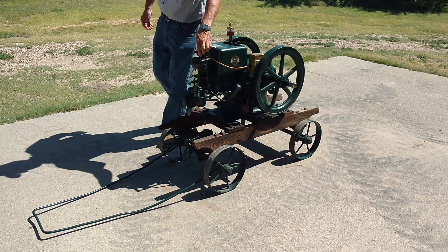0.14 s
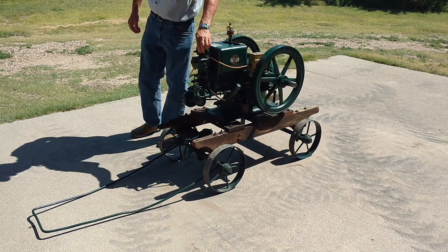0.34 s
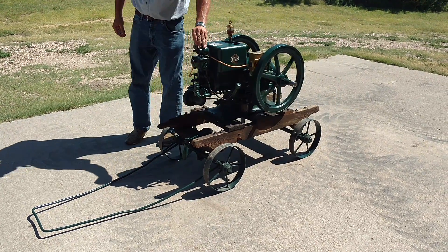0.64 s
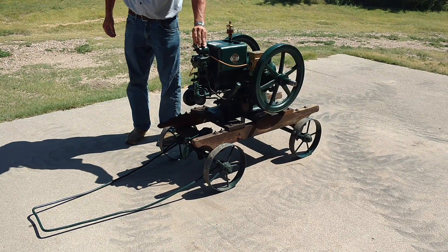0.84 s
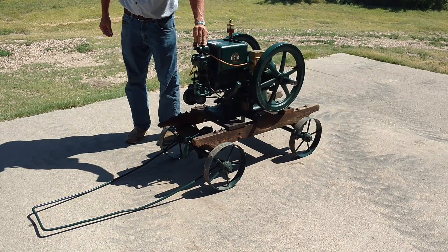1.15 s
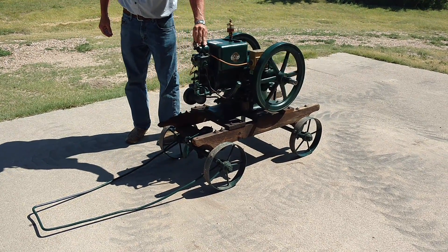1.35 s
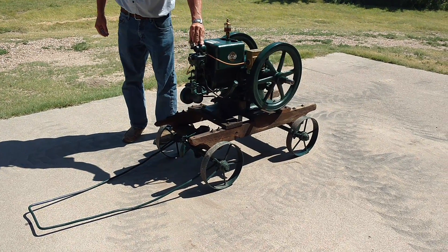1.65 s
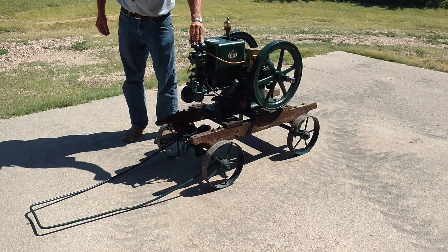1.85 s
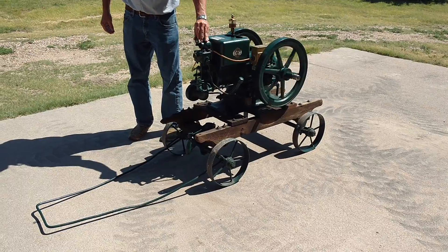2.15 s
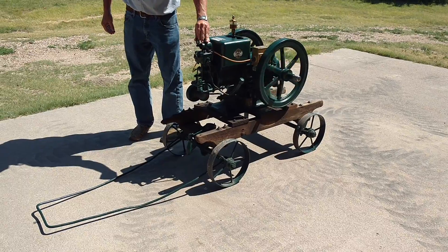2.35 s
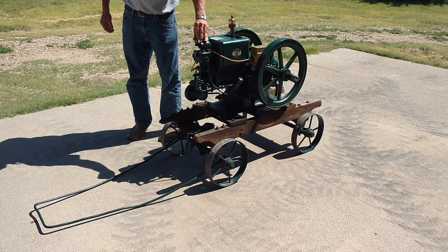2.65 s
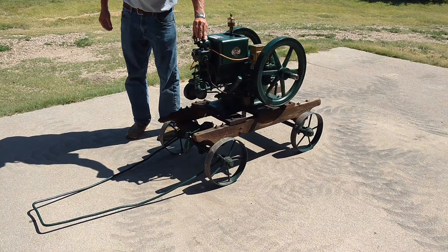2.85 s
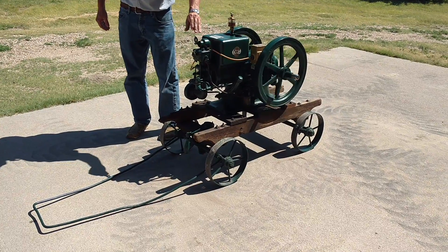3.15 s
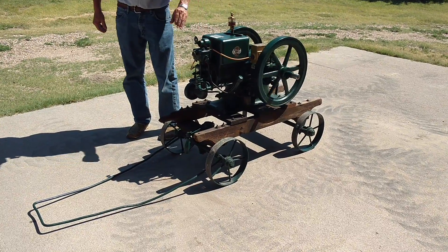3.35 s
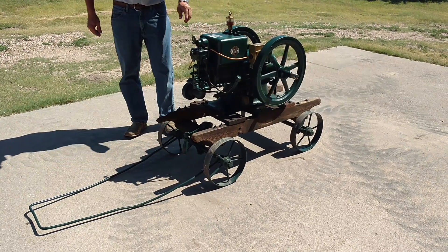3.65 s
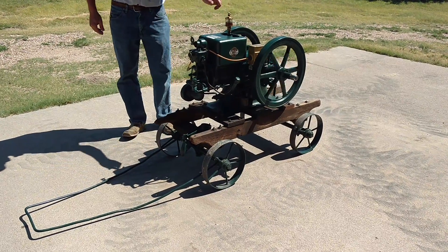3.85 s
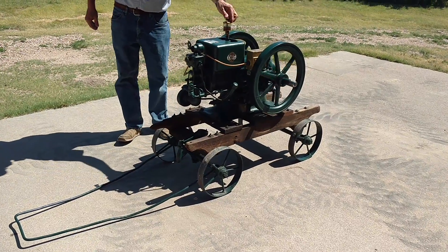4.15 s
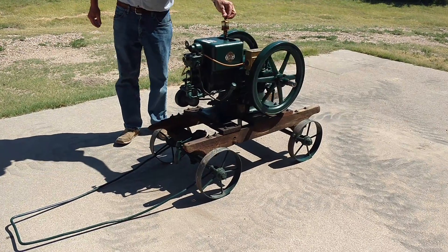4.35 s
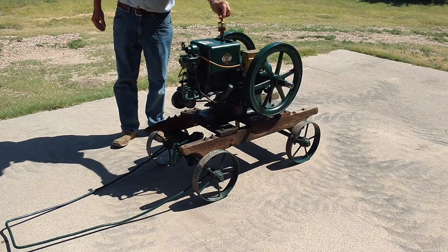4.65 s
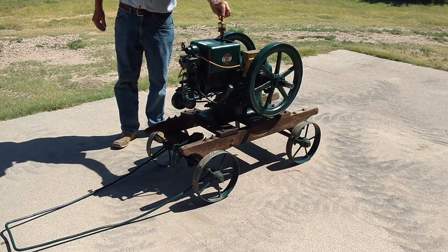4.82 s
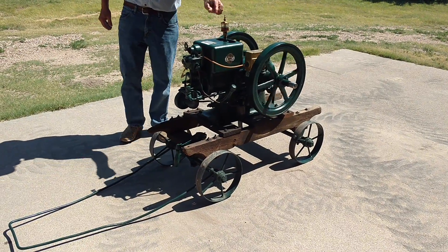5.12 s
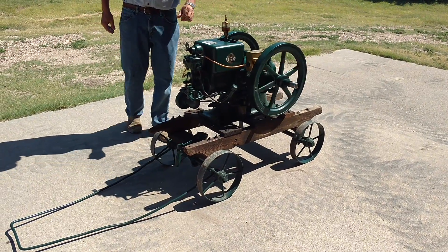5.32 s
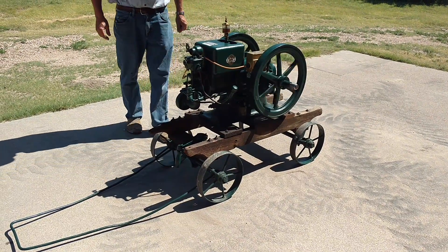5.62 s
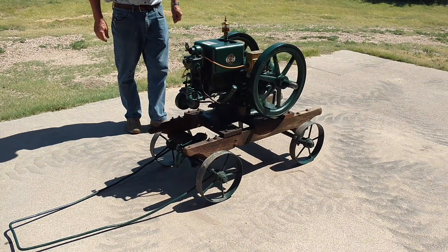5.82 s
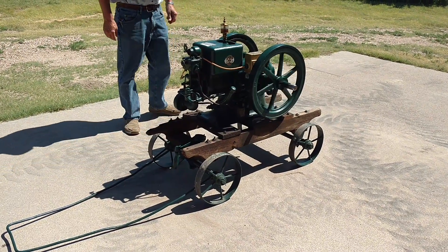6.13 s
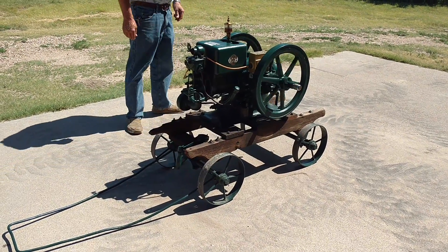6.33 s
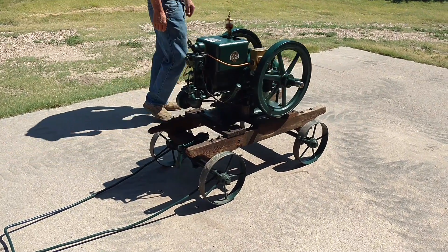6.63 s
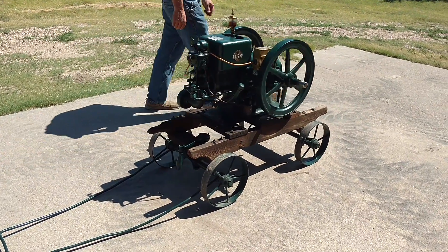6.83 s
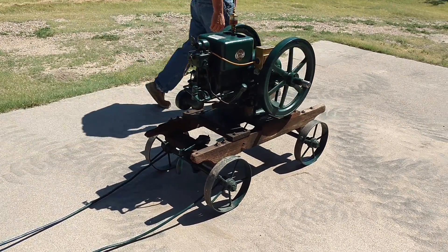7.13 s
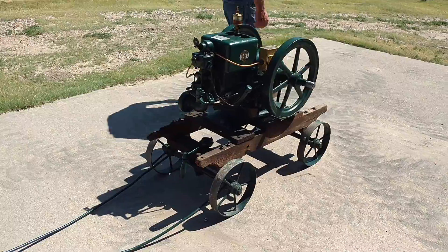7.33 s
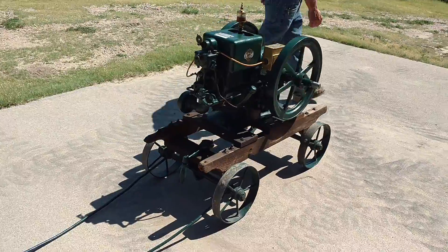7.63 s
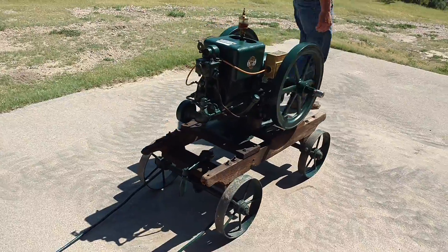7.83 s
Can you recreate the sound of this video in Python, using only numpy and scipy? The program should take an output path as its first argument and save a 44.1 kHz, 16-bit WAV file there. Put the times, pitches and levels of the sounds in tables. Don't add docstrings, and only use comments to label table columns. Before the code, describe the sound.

Steady mechanical clatter of a vintage stationary engine outdoors: ringing iron casting, gritty gear rumble, crisp ticking and thin high whistles once per turn. Brief noisy exhaust bursts punctuate it at uneven gaps. The pace quickens over the first two seconds, the clatter thickens and peaks around four, then turns gradually slow. Dry, close sound with a very short echo from concrete, faint cart drone and a low outdoor murmur.

```python
import sys
import numpy as np
from scipy import signal
from scipy.fft import rfft, irfft
from scipy.io import wavfile
from scipy.ndimage import uniform_filter1d

SR = 44100
rng = np.random.default_rng(int(sys.argv[2]) if len(sys.argv) > 2 else 0)


def file_out(sig):
    cols = np.atleast_2d(sig).T
    lim = np.clip(cols, -1, 1)
    pcm = np.round(lim * 32767).astype(np.int16)
    wavfile.write(sys.argv[1], SR, pcm)


def gain_from_db(level_db):
    decades = np.asarray(level_db, float) / 20
    return 10 ** decades


N = 351918
T = np.arange(N) / SR

# start_s, knock_db, tick_db, lever_db
TURNS = [(-0.21, -33.5, -42, -29.5), (0.122, -30.5, -40, -51), (0.443, -40, -39, -32),
         (0.734, -33, -52, -26), (1.022, -50, -53, -35), (1.29, -34, -45, -50), (1.555, -41, -40, -28),
         (1.804, -39, -36, -29), (2.04, -34, -35, -43), (2.274, -33, -37, -44), (2.513, -30.5, -39, -35),
         (2.754, -28.5, -33.5, -38), (3.008, -28, -42, -34), (3.258, -28, -30, -27),
         (3.512, -27.5, -34, -27.5), (3.773, -23, -27, -24), (4.04, -28.5, -34, -32),
         (4.312, -23.5, -29.5, -32), (4.595, -43, -35, -46), (4.881, -31, -38, -38),
         (5.179, -26.5, -33.5, -36), (5.485, -25, -40, -36), (5.792, -29.5, -31.5, -32.5),
         (6.104, -28, -35, -34), (6.427, -26, -31, -25), (6.756, -30, -35, -39), (7.081, -22, -31.5, -26.5),
         (7.416, -26.5, -32, -49), (7.742, -29.5, -34.5, -46), (8.075, -26, -32, -60)]
# share_of_turn, lag_s
PART_AT = [(0, 0), (.075, 0), (.06, .033), (.129, .043), (.315, 0), (.39, 0), (.487, -.016), (.51, 0),
           (.553, -.005), (.718, 0), (.623, .054), (.88, 0), (.657, .07), (.813, .043)]
# knock_db, tick_db, lever_db, firing_change_db
PART_DB = [(-9, 0.5, -43, 4), (-14, -3, 4, 6), (-6.5, 4.5, -15, 0), (-9.5, -10, -20, 0.5),
           (-5.5, 0, 6, -23), (-10, -8.5, -22, -43), (-2.5, 3, 1, 0.5), (-4.5, 10, -24, -13.5),
           (-16.5, -35, -12, 4), (-2, -27, -22, 2), (-10, -7.5, 10, -12), (-7, -16, 8, 0.5),
           (-36, -39, 18, 2), (-19.5, -33, 18.5, -35)]
# start_s, peak_db
KNOCKS_EARLY = [(0.035, -29), (0.127, -22), (0.264, -25), (0.356, -24), (0.446, -22), (0.498, -26.5),
                (0.533, -19), (0.827, -20.5), (1.029, -25.5), (1.099, -21), (1.291, -32), (1.558, -27.5),
                (1.605, -30), (1.631, -22), (1.866, -30), (1.881, -39), (2.04, -32), (2.11, -27),
                (2.209, -31), (2.281, -27), (2.516, -29), (2.564, -27), (2.599, -38), (2.637, -25.5),
                (2.76, -26), (2.809, -20), (2.864, -22), (2.936, -21.5), (3.008, -22.5), (3.054, -30),
                (3.07, -19), (3.134, -24), (3.223, -22), (3.26, -22.5), (3.308, -36), (3.366, -17),
                (3.389, -19), (3.443, -23), (3.48, -18.5), (3.516, -14), (3.562, -14.5), (3.7, -23),
                (3.777, -14), (3.824, -15.5), (3.855, -20), (3.892, -18), (3.965, -14)]
KNOCKS_LATE = [(4.007, -21), (4.045, -13), (4.091, -14.5), (4.238, -30), (4.314, -22), (4.365, -24),
               (4.437, -22), (4.455, -24), (4.512, -22.5), (4.598, -17), (4.649, -16.5), (4.678, -19),
               (4.883, -28.5), (5.093, -25), (5.183, -20), (5.232, -26.5), (5.314, -25.5), (5.4, -21),
               (5.489, -22), (5.539, -24), (5.623, -24), (5.71, -26), (5.795, -21.5), (5.848, -21.5),
               (5.926, -22.5), (6.017, -20), (6.109, -16), (6.168, -18), (6.19, -18), (6.246, -24),
               (6.334, -26), (6.427, -23), (6.482, -22), (6.569, -20), (6.592, -22.5), (6.662, -17.5),
               (6.724, -23), (6.757, -17), (6.813, -12), (6.835, -15.5), (6.898, -20), (6.993, -24),
               (7.081, -22), (7.135, -26), (7.225, -22), (7.322, -18.5), (7.418, -17.5), (7.479, -15.5),
               (7.512, -25), (7.56, -21.5), (7.651, -28), (7.743, -25.5), (7.796, -20), (7.889, -19)]
# pitch_hz, width_hz, level_db
IRON_MODES = [(510, 420, -6), (590, 210, 0.5), (701.7, 51, 1), (869, 43, -4.5), (938, 56, 0.5),
              (1023, 180, -3), (1277, 164, 1.5), (1543, 113, 1.5), (1720, 300, 0), (1898, 180, -1),
              (2200, 3800, 3.5)]
# start_s, gear_rumble_db, gas_hiss_db, cart_drone_db
RUNNING = [
    (0.0, -46.5, -48, -69),
    (2.33, -40.5, -47, -53.5),
    (3.51, -33.5, -40, -46),
    (5.07, -44.5, -48.5, -65),
    (6.58, -39.5, -43, -55.5),
    (7.98, -40.5, -46, -56),
]
# share_of_turn, rumble_change_db, hiss_change_db
SLACK = [
    (0, 3.5, 1.5),
    (.57, 0, -3),
    (.63, -10, -6.5),
    (.69, 1.5, -4),
    (.73, -1.5, 4.5),
    (.8, -2.5, -4.5),
    (.97, -2.5, -5.5),
    (1, -1, 2.5),
]
# start_s, peak_db, body_relative_to_peak_db, length_s, opening_pop_db
PUFFS = [(0.523, -9.5, 1.5, 0.035, -36), (0.81, -15.5, -12, 0.032, -52), (1.096, -7.5, 4, 0.027, -33),
         (1.623, -7, 1.5, 0.023, -33), (1.866, -12, 10.5, 0.024, -33), (2.102, -9.5, 5, 0.02, -32.5),
         (2.592, -18.5, 15.5, 0.015, -33.5), (3.069, -11.5, -9, 0.021, -26.5),
         (3.58, -12, -2, 0.018, -30.5), (4.105, -11.5, 4, 0.025, -29.5), (4.683, -6, 3.5, 0.012, -23.5),
         (5.563, -14.5, 0, 0.026, -30.5), (6.186, -11.5, -6, 0.025, -28), (6.84, -11.5, -8, 0.018, -26),
         (7.5, -13, 11.5, 0.026, -28)]
# pitch_hz, level_db
GAS_COLOUR = [(60, -64), (300, -11), (600, 0.5), (1500, -5.5), (3300, 7), (6000, 3.5), (9000, -1.5),
              (12000, -2.5), (15500, -7.5), (16500, -24)]
# start_s, peak_db, top_end_db
TICKS_EARLY = [(0.174, -31, -41), (0.2617, -20.5, -37), (0.2853, -24, -47), (0.5317, -10.5, -20.5),
               (0.6469, -39, -52), (0.822, -12.5, -43), (0.8824, -34, -45), (0.9333, -27, -46),
               (0.984, -31, -46), (1.027, -34, -41), (1.055, -39, -43), (1.0735, -31, -43),
               (1.107, -10, -36), (1.1623, -27, -47), (1.292, -30, -39.5), (1.3395, -32, -36),
               (1.5324, -32, -48), (1.6104, -28, -41), (1.6292, -8, -41), (1.8522, -32, -41),
               (1.875, -20, -22), (2.0313, -31, -43), (2.0892, -32, -39), (2.1086, -15, -22),
               (2.3226, -35, -42), (2.377, -23, -34), (2.3965, -27, -49), (2.5671, -32, -44),
               (2.595, -17.5, -41), (2.617, -22, -33), (2.6369, -27, -37), (2.7581, -26, -31),
               (2.8624, -20, -31.5), (2.883, -18, -42), (3.056, -20, -34), (3.0717, -11, -33),
               (3.1124, -15, -32), (3.133, -20, -39), (3.1872, -41, -49), (3.257, -20, -36),
               (3.3059, -20, -36), (3.3653, -19, -28.5), (3.386, -15.5, -36), (3.44, -26, -44),
               (3.474, -24, -44), (3.5146, -25, -37), (3.5617, -15.5, -35), (3.5876, -16, -38),
               (3.6224, -19, -30), (3.6436, -25, -43), (3.775, -41, -31), (3.8215, -19, -33),
               (3.861, -18, -40), (3.8866, -17, -27), (3.907, -21, -43), (3.9669, -24, -48)]
TICKS_LATE = [(4.0907, -20.5, -34), (4.114, -19, -26), (4.158, -30, -37), (4.18, -25.5, -48),
              (4.318, -27, -39), (4.364, -23.5, -35), (4.4326, -19.5, -31), (4.4554, -16.5, -38),
              (4.594, -22.5, -29), (4.6447, -20.5, -33), (4.6692, -30, -32), (4.684, -8, -25),
              (4.718, -29, -41), (4.9318, -31, -40), (5.008, -28, -35), (5.033, -25.5, -44),
              (5.181, -26, -36.5), (5.2315, -30, -38.5), (5.3098, -22, -36), (5.3356, -26, -50),
              (5.401, -33, -48), (5.5396, -25, -39), (5.571, -22, -23), (5.62, -23.5, -35.5),
              (5.6441, -27, -46), (5.7933, -31, -39), (5.846, -26.5, -42), (5.926, -19.5, -33),
              (5.951, -23.5, -49), (6.0178, -39, -55), (6.109, -24.5, -36), (6.1587, -20.5, -38),
              (6.1934, -31, -28), (6.243, -23, -31), (6.269, -23, -46), (6.479, -26, -35),
              (6.564, -19, -34), (6.5904, -22.5, -44), (6.759, -22, -37), (6.8093, -20, -32),
              (6.844, -33, -26), (6.897, -21, -35), (6.9212, -26.5, -44), (7.048, -24.5, -40),
              (7.133, -23.5, -35), (7.2235, -19, -34), (7.248, -21, -43), (7.372, -27, -42),
              (7.469, -18.5, -34), (7.507, -30, -22.5), (7.559, -24.5, -34), (7.5836, -28, -49),
              (7.711, -24, -38), (7.744, -24, -33), (7.797, -26, -35.5), (7.91, -24.5, -44)]
# pitch_hz, level_db
CLATTER_COLOUR = [(1500, -0.5), (2600, 1), (3500, -3.5), (4500, -4.5), (6000, -4), (8000, -2.5),
                  (10500, -7), (12500, -6), (14800, -13), (16000, -62)]
SMALL_PARTS_HZ = [3475, 4000, 4760, 5780, 7640]
# rod_db, rocker_db, spring_db
SQUEAK_DB = [(-60, -60, -52), (-68.5, -21, -49.5), (-37, -27.5, -54), (-40, -24.5, -52), (-47, -26.5, -57),
             (-37.5, -25.5, -51), (-43, -28, -60), (-37, -27, -53), (-41, -24.5, -50), (-36, -21.5, -47),
             (-31, -20, -52), (-30, -16.5, -43.5), (-33, -19, -43), (-34, -15, -43), (-42, -15, -41),
             (-30.5, -11, -36.5), (-33, -17, -47), (-29.5, -15, -48.5), (-51, -23, -55), (-36, -19.5, -57),
             (-34, -15.5, -64), (-50, -17, -57), (-31, -15.5, -56), (-30.5, -13, -49), (-31, -11.5, -66),
             (-34, -15, -59), (-27, -14.5, -42.5), (-33, -17, -57), (-30.5, -11.5, -56)]
# share_of_turn, lag_s
SQUEAK_PARTS = [
    (.401, -.005),
    (.535, .004),
    (.688, -.011),
]
# start_s, peak_db
CHIRPS = [(0.577, -42), (1.394, -42), (1.9, -39), (2.135, -40), (3.356, -28), (3.741, -39), (4.044, -40),
          (4.158, -31), (4.435, -33), (5.011, -39), (5.297, -39), (5.313, -44), (5.605, -36), (5.621, -42),
          (6.228, -34), (7.222, -39), (7.545, -34), (7.87, -30)]
# start_s, peak_db
PINGS = [(0.497, -43), (2.361, -41), (2.805, -38), (3.054, -38), (3.305, -33), (3.562, -33), (4.091, -37),
         (4.364, -39), (4.644, -37), (5.232, -41), (5.54, -38), (5.845, -44), (6.16, -34), (6.479, -42),
         (6.809, -36), (7.796, -40)]
# start_s, peak_db
TAPS = [(0.073, -36), (0.095, -35), (0.389, -41), (0.41, -34), (0.957, -41), (0.983, -43), (1.273, -39),
        (1.536, -37), (1.79, -38), (2.481, -39), (2.725, -34), (3.321, -34), (3.339, -36), (3.495, -34),
        (3.733, -37), (3.839, -38), (4.022, -30), (4.269, -35), (4.297, -38), (4.541, -46), (5.763, -38),
        (6.089, -44), (6.526, -37), (6.735, -26), (7.047, -39), (7.069, -42), (7.167, -39), (7.186, -33),
        (7.372, -27), (7.395, -28), (7.71, -29), (7.731, -33), (7.849, -33)]
# start_s, peak_db
STROKES = [(0.381, -61), (0.657, -66), (1.509, -68), (1.767, -70), (2.354, -61), (2.844, -53.5),
           (3.344, -50), (3.865, -50), (4.411, -53), (4.985, -60), (5.28, -59), (5.9, -58), (6.54, -54),
           (7.13, -52), (7.194, -56), (7.854, -60)]
# start_s, peak_db
CHUFFS = [
    (0.385, -28),
    (0.67, -29.5),
    (0.955, -23.5),
    (1.255, -29),
    (1.518, -29.5),
    (1.774, -26.5),
    (2.28, -44),
]
# start_s, length_s, level_db
SUCTION = [
    (0.005, 0.1, -49.5),
    (0.339, 0.086, -43.5),
    (0.647, 0.077, -54),
    (0.93, 0.065, -47.5),
    (1.23, 0.076, -54),
]
# pitch_hz, level_db
OUTDOORS_COLOUR = [(40, -10), (90, 2), (150, 5), (300, 0.5), (600, -18), (1500, -49), (5000, -31.5)]
# pitch_hz, level_db
SIDE_COLOUR = [(40, -16), (150, -17.5), (400, -18.5), (1000, -11.5), (2000, -7.5), (3500, -5.5), (6000, -2),
               (10000, 0), (15000, 3.5)]


def gears(knocks, rumble_db):
    teeth = flicker(38, 4.0)
    push = gain_from_db(-16.0) * blows(knocks, 0.00096, 0.011, 0.97) + gain_from_db(rumble_db - 12.5) * teeth
    crack = gain_from_db(-14.5) * blows(knocks, 0.00016, 0.00062, 1.0)
    return push * flicker(700, 2.15) + crack


def casting(push):
    rings = 0
    for hz, width, db in IRON_MODES:
        uneven_push = push * flicker(50, 3.3) * noise(0.18)
        even_width = np.sqrt(SR / width) / 4
        rings += gain_from_db(db) * even_width * band(uneven_push, hz, width)
    return signal.sosfilt(signal.butter(N=4, Wn=2300, fs=SR, output="sos"), rings)


def exhaust():
    roar, boom, pop = np.zeros((3, N))
    for s, db, body_db, length, pop_db in PUFFS:
        shut_db = -25 + 0.32 * pop_db
        near = slice(int(s * SR) - 882, int(s * SR) + 4410)
        t = T[near] - s
        swell = gain_from_db(db - 18.0) * np.sin(np.pi * np.clip(t / length, 0, 1) ** 0.83) ** 1.02
        roar[near] += swell
        boom[near] += swell * gain_from_db(body_db - 17.0)
        opening = wavelet(t + 0.0016, 580, 1.0) + gain_from_db(5.0) * wavelet(t - 0.001, 172, 0.5)
        pop[near] += gain_from_db(pop_db) * opening
        pop[near] += gain_from_db(shut_db + 8.0) * wavelet(t - length - 0.008, 123, 0.57, glide=8.5)
        pop[near] += gain_from_db(shut_db - 15.0) * wavelet(t - length - 0.035, 178.0, 6.7, glide=1.1)
    turbulence = flicker(500, 2.5)
    return roar * turbulence * unit(colour(noise(1.0), GAS_COLOUR)) + pop, boom


def valve_gear(ticks, tops, taps, hiss_db):
    when, luck = rng.random((450, 2)).T
    s = when * N / SR
    stray = np.transpose([s, hiss_db[(s * SR).astype(int)] - 2.2 * np.log(luck + 0.03)])
    snap, top_snap = (gain_from_db(-9.0) * blows(rows, 0.0008, 0.0056, 1.05) for rows in (ticks, tops))
    push = gain_from_db(-9.5) * blows(stray, 0.00058, 0.0074, 5.8)
    push += gain_from_db(-35.5) * blows(taps, 0.00028, 0.0046, 1.1)
    hiss = gain_from_db(hiss_db - 18.0) * flicker(31, 0.9)
    metal = unit(colour(noise(0.19), CLATTER_COLOUR))
    out = 0
    for hz, hiss_tilt_db in [(3400, 10.0), (4700, 10.0), (6600, -24), (9300, -27), (13000, -22)]:
        colour_chance = flicker(70, 3.5)
        drive = push + (snap if hz < 8000 else top_snap) + hiss * gain_from_db(hiss_tilt_db)
        metal_band = band(band(metal, hz, 0.7 * hz), hz, 0.7 * hz)
        out += drive * colour_chance * metal_band
    out *= flicker(600, 1.6)
    return out + sum(gain_from_db(-1) * flicker(45, 4.5) * band(out, hz, 264) for hz in SMALL_PARTS_HZ)


def squeaks():
    turns_of_parts = []
    for part, levels in zip(SQUEAK_PARTS, np.transpose(SQUEAK_DB)):
        rows = zip(moments(*part), levels)
        turns_of_parts.append([row for row in rows if 0 < row[0] < N / SR])
    rod, rocker, spring = turns_of_parts
    out = gain_from_db(-4) * squeak(rod, 5850, 0.032, 0.026, -12, 0, rough=0.04)
    out += gain_from_db(-5.5) * squeak(CHIRPS, 7350, 0.01, 0.018, -25, 4.8, rough=0.032)
    out += gain_from_db(-1.5) * squeak(np.add(PINGS, [0.003, 0]), 12000, -0.01, 0.008, -60, 0, rough=0.03)
    out += gain_from_db(-16.5) * squeak(rocker, 5703, 0.128, 0.023, -7.0, 0, rough=0.122)
    out += gain_from_db(6) * squeak(spring, 8370, 0.002, 0.018, -30, -4, rough=0.006)
    return out


def lever(taps):
    tune_hz = 10330 * (1 + 0.0044 * uniform_filter1d(rng.standard_normal(N), size=100) * 10)
    ring = blows(taps, 0.0008, 0.014, 1.6) * np.sin(2 * np.pi * np.cumsum(tune_hz) / SR)
    return gain_from_db(-32) * flicker(200, 3.0) * ring * gain_from_db([[-14], [0]])


def piston():
    thud = np.zeros(N)
    for s, db in STROKES:
        near = slice(int(s * SR), int(s * SR) + 2205)
        thud[near] += gain_from_db(db + 23.0) * wavelet(T[near] - s - 0.016, 97, 0.59)
    for s, db in CHUFFS:
        near = slice(int(s * SR), int(s * SR) + 2205)
        t = T[near] - s
        hollow = wavelet(t - 0.008, 390, 0.85, glide=-2) + gain_from_db(-2) * wavelet(t - 0.01, 144, 0.47)
        thud[near] += gain_from_db(db - 11.5) * hollow
    puff = blows(CHUFFS, 0.002, 0.008, 1.2)
    return thud + gain_from_db(-14) * puff * unit(band(band(noise(0.88), 440, 150), 330, 190))


def intake():
    swell = 0
    for s, length, db in SUCTION:
        swell += gain_from_db(db) * np.sin(np.pi * np.clip((T - s) / length, 0, 1)) ** 0.23
    return swell * flicker(58.3, 3.3) * unit(band(colour(noise(0.17), CLATTER_COLOUR), 5700, 17000))


def concrete_echo(engine):
    echo = rng.standard_normal((2, 3000)) * np.exp(-T[:3000] / 0.0099) * gain_from_db(-39.5)
    return signal.fftconvolve(engine, echo, axes=-1)[:, :N]


def surroundings(drone_db):
    note = unit(band(band(noise(0.5), 221, 22), 224, 40))
    drone = gain_from_db(drone_db + 3.0) * flicker(22, 2.2) * note
    gusts = flicker(8, 3.0)
    return drone + gain_from_db(-53.5) * gusts * unit(colour(noise(0.084), OUTDOORS_COLOUR))


def moments(share, lag):
    start = np.array(TURNS)[:, 0]
    return start[:-1] + share * np.diff(start) + lag


def strikes():
    scatter_db, slack_s = 1.5, 0.001
    turns, rows = np.array(TURNS), []
    fired = np.histogram(np.array(PUFFS)[:, 0], turns[:, 0])[0] > 0
    for at, (*db, firing_db) in zip(PART_AT, PART_DB):
        chance = rng.standard_normal((len(fired), 4))
        levels = turns[:-1, 1:] + db + firing_db * fired[:, None] + scatter_db * chance[:, 1:]
        rows += list(np.c_[moments(*at) + slack_s * chance[:, 0], levels])
    s, *columns = np.transpose([row for row in rows if 0 < row[0] < N / SR])
    return (np.transpose([s, db]) for db in columns)


def with_clear(ruled, clear, gain_db):
    apart = np.abs(ruled[:, :1] - clear[:, 0]).min(axis=1) > 0.009
    return np.r_[ruled[apart], clear + [0, gain_db]]


def blows(table, rise, fall, abrupt=0.37):
    s, db = np.transpose(table)
    train = np.bincount(np.clip(s * SR, 0, N - 1).astype(int), gain_from_db(db), N)
    t = T[:4410]
    shape = (1 - np.exp(-t / rise)) * np.exp(-(t / fall) ** abrupt)
    return signal.fftconvolve(train, shape / shape.max())[:N]


def squeak(table, hz, glide, length, octave_db, side_db, rough=0.015):
    out, t = np.zeros(N + SR), T[:int(length * SR)]
    for (s, db), (tune, turn) in zip(table, rng.standard_normal((len(table), 2))):
        wobble = rough * uniform_filter1d(rng.standard_normal(len(t)), size=30) * 5
        pitch_hz = hz * (1 + 0.0035 * tune + glide * t / length + wobble)
        phase = turn + 2 * np.pi * np.cumsum(pitch_hz) / SR
        at = max(int((s - 0.34 * length) * SR), 0)
        swell = np.sin(np.pi * (t / length) ** 0.69) ** 1.8
        out[at:at + len(t)] += gain_from_db(db) * swell * (np.sin(phase) + gain_from_db(octave_db) * np.sin(2 * phase))
    grit = flicker(300, 2.5)
    return out[:N] * grit * gain_from_db([[0], [side_db]])


def wavelet(t, hz, turns, glide=0):
    return np.exp(-(t * hz / turns) ** 2) * np.sin(2 * np.pi * hz * t * (1 + glide * t))


def flicker(rate, depth_db):
    steps = gain_from_db(depth_db * rng.standard_normal(8000))
    return np.interp(T * rate, np.arange(len(steps)), steps)


def noise(alike):
    a, b = rng.standard_normal((2, N))
    alike = np.clip(alike, 0, 1)
    return np.array([a, alike * a + np.sqrt(1 - alike ** 2) * b])


def unit(x):
    return x / np.sqrt(np.mean(x ** 2))


def band(x, hz, width):
    return signal.lfilter(*signal.iirpeak(hz, hz / width, SR), x)


def colour(x, points):
    hz, db = np.transpose(points)
    grid = np.log(np.fft.rfftfreq(4096, 1 / SR) + 1)
    cep = irfft(np.log(gain_from_db(np.interp(grid, np.log(hz), db))))
    cep[1:2048] *= 2
    cep[2049:] = 0
    return signal.fftconvolve(x, irfft(np.exp(rfft(cep)))[None], axes=-1)[:, :N]


def scene():
    s, *columns = np.transpose(RUNNING)
    rumble_db, hiss_db, drone_db = (np.interp(T, s, c) for c in columns)
    share, rumble_dip, hiss_dip = np.transpose(SLACK)
    turn = np.interp(T, np.array(TURNS)[:, 0], np.arange(len(TURNS))) % 1
    rumble_db = rumble_db + np.interp(turn, share, rumble_dip)
    hiss_db = hiss_db + np.interp(turn, share, hiss_dip)

    knocks, ticks, taps = strikes()
    knocks = with_clear(knocks, np.r_[KNOCKS_EARLY, KNOCKS_LATE], -5)
    clear = np.r_[TICKS_EARLY, TICKS_LATE]
    tops = with_clear(ticks, clear[:, ::2], 5.5)
    ticks = with_clear(ticks, clear[:, :2], -6)

    gas, boom = exhaust()
    engine = casting(gears(knocks, rumble_db) + boom) + gas
    engine += valve_gear(ticks, tops, taps, hiss_db) + squeaks()
    engine += lever(with_clear(taps, np.array(TAPS), 25))
    engine += piston() + intake()
    return engine + concrete_echo(engine) + surroundings(drone_db)


def band_limit(x):
    return signal.sosfilt(signal.butter(12, 16470, fs=SR, output="sos"), x)


def record(dry):
    comb_lag = 17
    delayed = np.pad(dry, ((0, 0), (comb_lag - 1, 0)))[:, :N]
    late = signal.lfilter([0.2, 0.6, 0.2], 1, delayed)
    mid = dry[0] - 0.96 * late[0]
    treble = signal.butter(N=2, Wn=3300, btype="high", fs=SR)
    mid += gain_from_db(-8) * flicker(40, 5) * signal.lfilter(*treble, np.roll(dry[1], shift=64))
    side = colour((dry + 0.9 * late)[1:], SIDE_COLOUR)[0]
    top = signal.ellip(8, 0.3, 60, 15850, fs=SR, output="sos")
    return band_limit(signal.sosfilt(top, [mid + side, mid - side]))


dry = scene()
out = record(dry)
file_out(out)
```